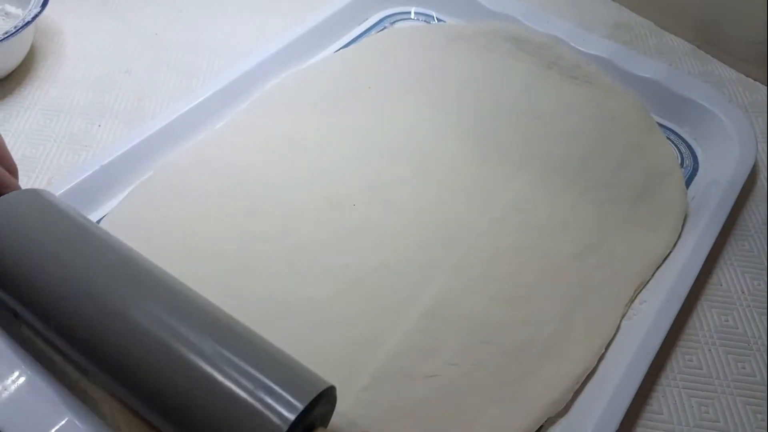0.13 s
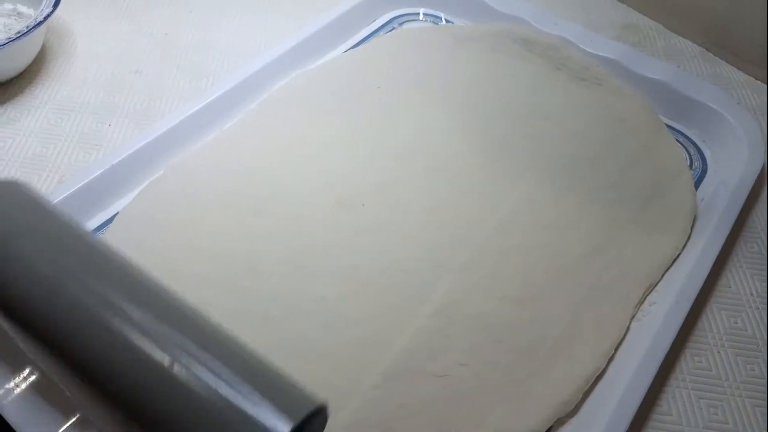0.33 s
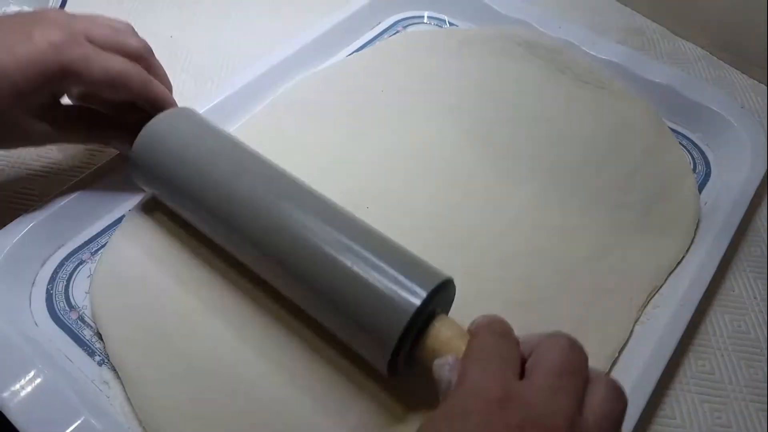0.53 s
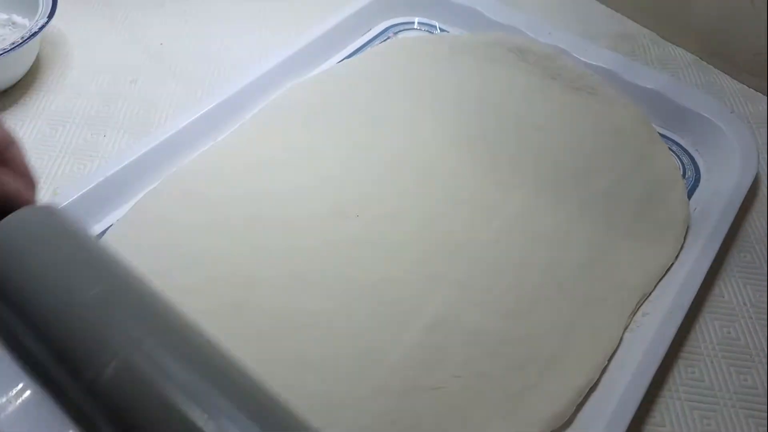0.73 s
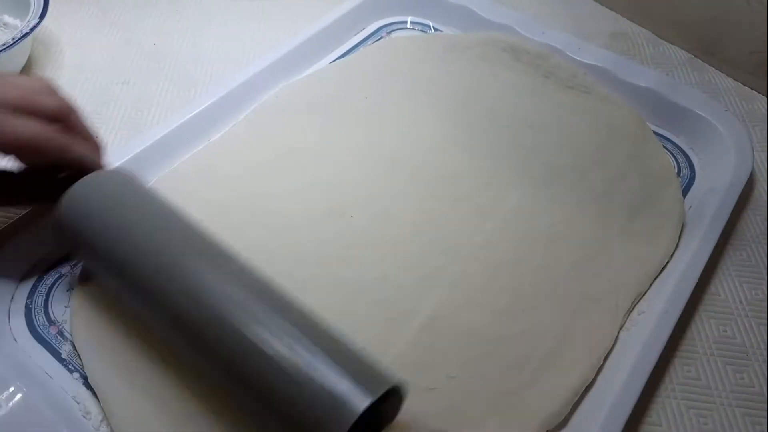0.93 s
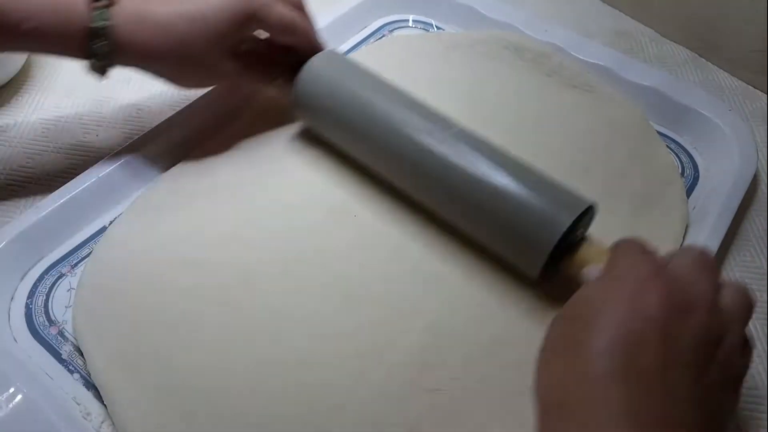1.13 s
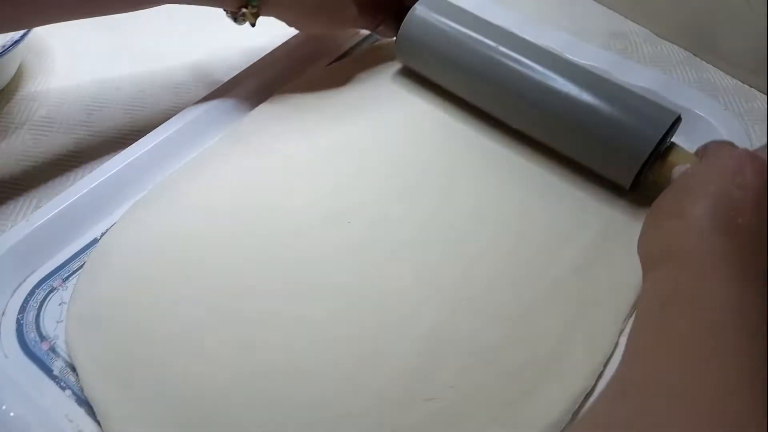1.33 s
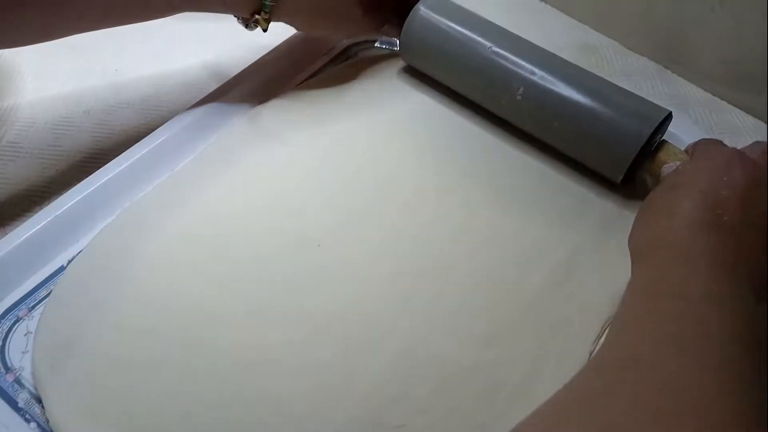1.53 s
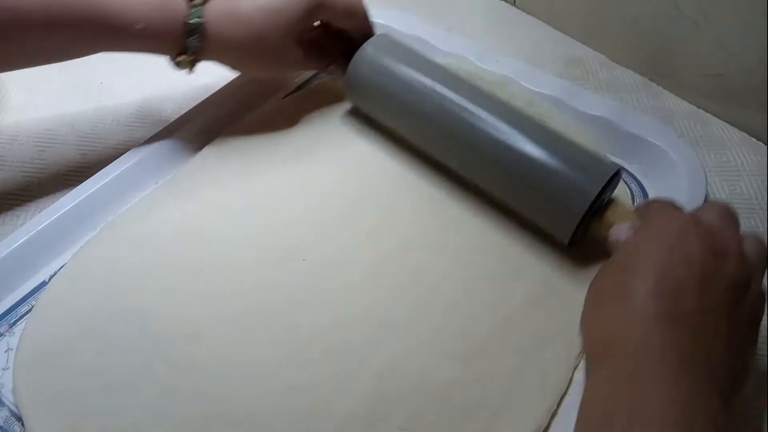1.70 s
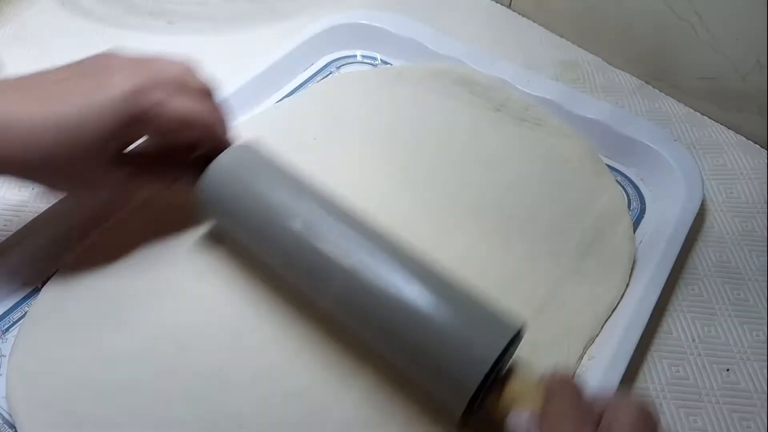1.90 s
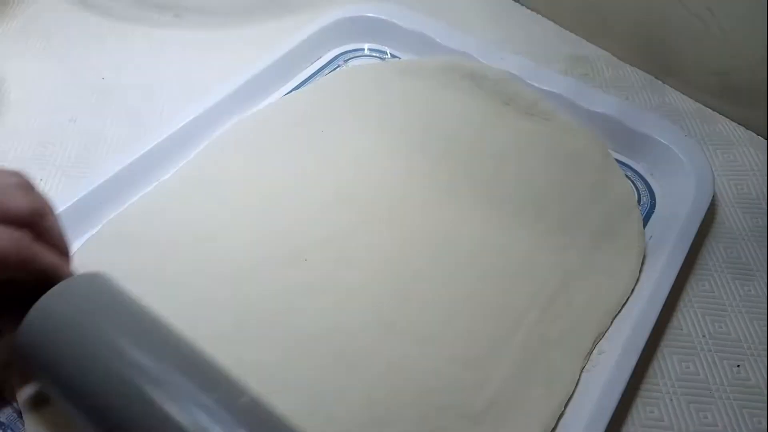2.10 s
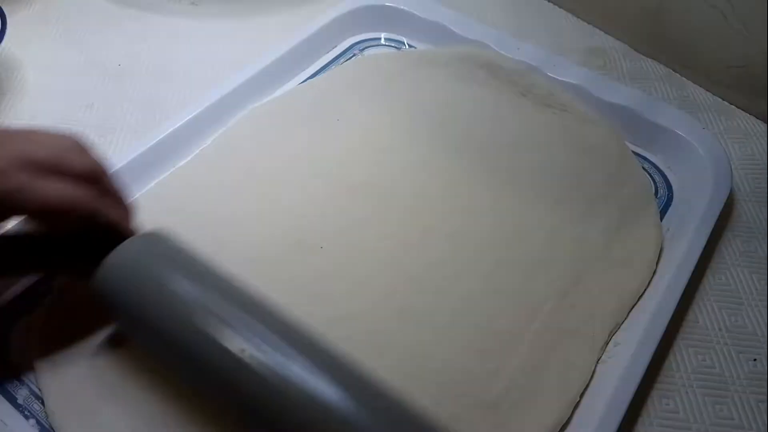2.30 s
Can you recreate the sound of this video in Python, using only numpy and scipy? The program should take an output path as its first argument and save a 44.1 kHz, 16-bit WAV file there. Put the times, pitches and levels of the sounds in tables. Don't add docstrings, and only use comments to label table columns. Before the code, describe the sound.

Hollow rolling pin clacks and thuds onto a dough tray, then hisses softly to and fro

```python
import sys
import numpy as np
from scipy import signal
from scipy.io import wavfile
from scipy.ndimage import uniform_filter1d

SR = 44100
rng = np.random.default_rng(int(sys.argv[2]) if len(sys.argv) > 2 else 0)


def makeup_ratio(level_db):
    decades = np.asarray(level_db, float) / 20
    return 10 ** decades


def file_out(sig):
    cols = np.atleast_2d(sig).T
    lim = np.clip(cols, -1, 1)
    pcm = np.round(lim * 32767).astype(np.int16)
    wavfile.write(sys.argv[1], SR, pcm)


N = 103635

# start_s, level_db, table_boom_db, brightness_db (per octave)
THUDS = [
    (0.2041, -22, -2, -1.5),
    (0.787, -12, -6.5, 0),
    (1.1318, -36, -9, -1.5),
    (1.165, -48, -12.5, -1),
]
# mode_hz, level_db, t60_s
TABLE = [(77, -27.5, 0.13), (84, -14.5, 0.27), (96.1, 1, 0.25), (136.6, -5, 0.2), (159.9, -6.5, 0.17),
         (220, -12.5, 0.14)]


def evened(x):
    return x / np.sqrt(np.mean(x ** 2) + 1e-20)


def read(points, hz):
    f, value = np.transpose(points)
    return np.interp(np.log(hz + 1), np.log(f + 1), value)


def colour(x, points):
    hz = abs(np.fft.fftfreq(8192, 1 / SR))
    log_gain = read(points, hz) * np.log(10) / 20
    response = np.exp(np.conj(signal.hilbert(log_gain)))
    taps = np.fft.ifft(response).real[:4096]
    return signal.oaconvolve(x, taps)[:len(x)]


def add(mix, s, sound):
    part = mix[round(s * SR):][:len(sound)]
    part += sound[:len(part)]


def ring(modes, bright_db=0, pitch=1, bend_s=0, length=1):
    t = np.arange(SR // 2)[:, None] / SR
    hz, db, t60 = np.transpose(modes)
    level_luck, pitch_luck = rng.standard_normal((2, len(hz)))
    db = db + 2.0 * level_luck + bright_db * np.log2(hz / 2000)
    rise_s = 0.0001 + bend_s * np.sqrt(500 / hz)
    rise = 1 - np.exp(-(t / rise_s) ** 2)
    decay = makeup_ratio(db - 60 * t / (t60 * length))
    tones = np.sin(2 * np.pi * hz * pitch * (1 + 0.0088 * pitch_luck) * t)
    y = (decay * rise * tones).sum(1)
    return y / abs(y).max()


def crack(points, t60, bright_db):
    t = np.arange(SR // 2) / SR
    tilted = [(f, db + bright_db * np.log2(f / 2000)) for f, db in points]
    y = colour(rng.standard_normal(len(t)) * makeup_ratio(-60 * t / t60), tilted)
    return y / abs(y).max()


def air():
    # freq_hz, level_db
    room_tone = [(20, -24), (100, 0), (250, -9.5), (560, -12.5), (900, -17), (2000, -22), (7500, -28.5),
                 (16000, -45)]
    return makeup_ratio(-61) * evened(colour(rng.standard_normal(N + SR), room_tone)[SR:])


def table():
    # start_s, level_db, ring_length_factor
    wobbles = [(.0, -42, 0.93), (0.037, -40.5, 0.26), (0.225, -37.5, 0.2), (0.282, -32.5, 0.97),
               (0.331, -46, 1), (0.433, -39.5, 0.93), (0.557, -37, 0.53), (0.599, -33.5, 0.61),
               (0.69, -46, 0.55), (0.81, -24, 0.76), (0.863, -26, 0.7), (0.923, -28.5, 1),
               (0.997, -37.5, 0.54), (1.027, -37.5, 0.47), (1.101, -39.5, 0.95), (1.164, -42.5, 1.0),
               (1.206, -43.5, 0.99), (1.353, -53, 0.74), (1.4, -54, 0.78), (1.489, -47, 1),
               (1.517, -42.5, 0.96), (1.583, -43.5, 0.94), (1.686, -39, 0.74), (1.808, -42.5, 1),
               (1.933, -39, 1), (2.017, -46, 0.48), (2.048, -42.5, 0.17), (2.168, -44.5, 1.0),
               (2.207, -43, 1), (2.248, -46, 1)]
    soft_s = 0.009
    tremble = rng.standard_normal(N + SR)
    hum = signal.oaconvolve(tremble, ring(TABLE, bend_s=0.0013))[SR:SR + N]
    out = makeup_ratio(-53) * evened(hum)
    for s, db, length in wobbles:
        add(out, max(s - soft_s, 0), makeup_ratio(db + 2.5) * ring(TABLE, bend_s=soft_s, length=length))
    return out


def rub():
    # time_s, effort_db, near_handle_load (0-1), far_handle_load (0-1)
    roll = [(0.202, -74, .3, .3), (.78, -53, .4, 0.3), (.95, -44, .4, .1), (1.091, -40, 0.2, 0.2),
            (1.17, -41, .5, .7), (1.24, -44.5, .6, 0.7), (1.34, -48, .3, 0.64), (1.45, -55.5, 0.4, 1),
            (1.479, -57, .3, .8), (1.592, -67, 0.08, 1), (1.606, -55, 0.8, .4), (1.661, -57, .1, 1),
            (1.7, -49.5, 0.6, .9), (1.799, -46, .8, .7), (1.885, -40.5, 0.6, 0), (2.071, -45, .7, 0),
            (2.13, -53.5, 0.8, 0), (2.214, -52, 1, 0), (2.251, -76, 0.97, 0.3), (2.286, -57.5, 1, 0.2),
            (2.319, -43, 0.9, 0)]
    # freq_hz, level_db
    friction = [(200, -26.5), (550, -10.5), (1000, -17), (1600, -7.5), (2500, -5.5), (4500, -3.5),
                (6500, -1), (16000, -6)]
    # centre_hz, width_hz, gain_db
    tube = [(4250, 300, 2.5), (5300, 240, 2), (6300, 900, 3.5), (7700, 250, -3.5)]
    # centre_hz, width_hz, gain_db
    near_handle = (2050, 220, 16)
    # centre_hz, width_hz, gain_db
    far_handle = (3180, 80, 20)

    grains_per_s, grain_share = 3000, 0.36
    grain_size = makeup_ratio(2.5 * np.minimum(rng.exponential(1, N), 5))
    grit = grain_size * (rng.random(N) < grains_per_s / SR) * rng.standard_normal(N)
    drive = grain_share * evened(grit) + (1 - grain_share) * rng.standard_normal(N)
    hz, t, z = signal.stft(drive, SR, nperseg=512, noverlap=384)

    def drift(noise, bins, frames):
        smooth = uniform_filter1d(noise, size=bins, axis=0)
        return evened(uniform_filter1d(smooth, size=frames, axis=1))

    def bump(centre_hz, width_hz, gain_db):
        return (gain_db / (1 + (2 * (hz - centre_hz) / width_hz) ** 2))[:, None]

    noise = rng.standard_normal(z.T.shape).T
    blobs = drift(noise[::-1], 9, 18)
    patches = drift(noise, 2, 36)
    s, effort_db, near, far = np.transpose(roll)
    near = np.clip(np.interp(t, s, near), 0, 1)
    far = np.clip(np.interp(t, s, far), 0, 1)
    peaks_db = sum(bump(*row) for row in tube)
    peaks_db = peaks_db + near * bump(*near_handle) + far * bump(*far_handle)
    z = z * makeup_ratio(read(friction, hz)[:, None] + peaks_db + 3.0 * patches + 2.5 * blobs)
    hiss = evened(signal.istft(z, SR, nperseg=512, noverlap=384)[1][:N])
    return hiss * makeup_ratio(np.interp(np.arange(N) / SR, s, effort_db))


def gives():
    # start_s, level_db, pitch_hz, t60_s
    fuzzy_notes = [(0.2036, -30, 4600, .02), (.31, -34.5, 571, .15), (.44, -48, 185, .2),
                   (0.449, -36, 3400, .02), (.465, -46.5, 354, .35), (.478, -26, 2200, .03),
                   (.555, -42.5, 697, 0.14), (.5545, -31, 4900, .016), (0.582, -23.5, 4220, .03),
                   (.583, -24.5, 6120, .02), (.585, -37.5, 533.7, .3), (.788, -26, 4320, .025),
                   (0.789, -29, 1310, .08), (.792, -29, 946, .1), (0.794, -30.5, 449, .12),
                   (.8, -37, 220, .2), (1.133, -35, 568, 0.032), (1.133, -45.5, 297, 0.17),
                   (1.133, -41.5, 1940, .03), (1.21, -58, 594, 0.87), (1.4, -65.5, 600, 0.38),
                   (1.57, -63, 802, 0.27), (1.94, -54.5, 490, 0.2), (1.945, -54.5, 308, 0.17),
                   (1.95, -58, 623, .12), (1.133, -46.5, 806, .06), (1.134, -50.5, 426, 0.06),
                   (.588, -27, 1775, 0.029), (.583, -24, 3100, .02), (0.48, -37, 948, .04),
                   (1.969, -59, 1054, 0.12), (.86, -38.5, 375, 0.14)]
    out = np.zeros(N)
    for s, db, hz, t60 in fuzzy_notes:
        offsets = rng.uniform(-2, 2, size=5)
        cluster = [(hz * (1 + 0.05 * u), -4 * abs(u), t60) for u in offsets]
        add(out, s, makeup_ratio(db + 6) * ring(cluster, bend_s=0.004))
    return out


def thuds():
    # mode_hz, level_db, t60_s
    tray_modes = [(267, -8, 0.067), (350, -3, 0.055), (539.5, -2.5, 0.049), (683, 2.5, 0.026),
                  (845, -5.5, 0.038), (1080, -10, 0.036), (1350, -7, 0.029), (2053, -9, 0.029),
                  (2524, -6, 0.044), (2820, -11.5, 0.013), (4274, -8, 0.0098)]
    # freq_hz, level_db
    tray_crack = [(150, -45), (400, -7), (800, -1), (1300, 4), (2550, -2.5), (4500, 2.5), (7000, -13),
                  (16000, -11)]
    out = np.zeros(N)
    for s, db, boom_db, bright_db in THUDS:
        tray = ring(tray_modes, bright_db, bend_s=0.005)
        tray = tray + makeup_ratio(5.5) * crack(tray_crack, 0.03, bright_db)
        boom = ring(TABLE, bend_s=0.0072, length=0.29)
        add(out, s, makeup_ratio(db + 4.5) * (tray + makeup_ratio(1 + boom_db) * boom))
    return out


def shudder():
    # freq_hz, level_db
    blur = [(120, -20), (250, 0.5), (500, -0.5), (950, -1), (1500, -5), (3000, -14), (6000, -25)]
    out = np.zeros(N)
    rise = np.minimum(np.arange(SR // 2) / SR / 0.009, 1)
    for s, db, boom_db, bright_db in THUDS:
        add(out, s, makeup_ratio(db - 16) * rise * crack(blur, 0.41, 0))
    return out


def clacks():
    # start_s, level_db, brightness_db (per octave), pitch_factor, ring_db (against crack)
    knocks = [(0.3047, -14.5, 0, 1.05, 7), (0.3089, -17, -3.5, 0.98, 10), (0.3141, -16.5, 5.5, 1.05, -2.5),
              (0.3175, -18, 2.5, 0.9, 8), (0.3212, -20, 1.5, 0.88, 8), (0.329, -31.5, 0.5, 1.1, 6.5),
              (0.4502, -25, 3, 1.0, -3.5), (0.4525, -25, 4, 0.82, -8), (0.4575, -29, -3.5, 0.9, 8),
              (0.4764, -24, -1.5, 1.04, 12), (0.4797, -26, 6, 1.04, 1.5), (0.484, -25, -3, 0.89, 7.5),
              (0.554, -12.5, -4.5, 1.1, 3), (0.5559, -19.5, 1, 0.93, 5.5), (0.558, -18.5, -3, 1.3, -1.5),
              (0.5831, -6.5, 1, 1.02, -12), (0.5844, -15, 3, 0.93, -2), (0.588, -15, -1, 0.97, -0.5),
              (0.5965, -25, -1, 1.1, -2), (0.852, -42, 4, 0.62, 3), (0.858, -35.5, -2.5, 1.15, 5),
              (1.847, -46, -2, .61, 9)]
    # mode_hz, level_db, t60_s
    pin_modes = [(1300, -9.5, .015), (1420, -5.5, 0.033), (1690, -11.5, 0.0068), (1759, -12, .02),
                 (2017, -0.5, 0.032), (2230, -1, 0.039), (2660, -8.5, .02), (3590, -3, 0.0076),
                 (4280, -14.5, 0.011), (4900, -9, 0.016), (5290, -17.5, .015), (6290, -11, 0.054),
                 (7120, -17.5, .015)]
    # freq_hz, level_db
    pin_crack = [(300, -62.5), (800, -15), (1300, 5), (2400, 1.5), (4200, 1), (5200, -4.5), (6300, -7),
                 (16000, -17.5)]
    out = np.zeros(N)
    for s, db, bright_db, pitch, ring_db in knocks:
        knock = makeup_ratio(ring_db) * ring(pin_modes, bright_db, pitch, 0.00039)
        knock = knock + makeup_ratio(4) * crack(pin_crack, 0.025, bright_db)
        add(out, s, makeup_ratio(db + 7.5) * knock / abs(knock).max())
    return out


def kitchen(x):
    # freq_hz, t60_s
    reverb = [(200, 0.61), (800, 0.49), (1400, 0.47), (3000, 0.38), (8000, 0.37)]
    # delay_s, level_db
    echoes = [(.0031, -21.5), (.0054, -19.5), (.0092, -21.5), (0.0143, -26), (0.0212, -21.5)]
    out = np.zeros(N)
    turn = np.arange(N) / SR * 23
    for k in range(3):
        taps = np.zeros(SR)
        at = np.arange(200, SR - 20, 20)
        taps[at + rng.integers(0, 20, len(at))] = rng.choice([-1., 1.], len(at))
        hz, t, z = signal.stft(taps, SR, nperseg=256)
        decay = makeup_ratio(-60 * t / read(reverb, hz)[:, None])
        tail = signal.istft(z * decay, SR, nperseg=256)[1]
        share = np.sqrt(2 / 3) * np.cos(np.pi * (turn + k / 3))
        out += signal.fftconvolve(x * share, makeup_ratio(-9.5) * tail / np.linalg.norm(tail))[:N]
    for s, db in echoes:
        add(out, s, makeup_ratio(db) * x)
    return out


def scene():
    rolling = rub()
    hits = thuds() + clacks()
    reflected = kitchen(hits + makeup_ratio(-14) * rolling)
    mix = hits + rolling + reflected + table() + gives() + shudder() + air()
    return mix[None]


def top_cut(x):
    return signal.sosfilt(signal.butter(12, 15750, fs=SR, output="sos"), x)


def record(dry):
    # freq_hz, gain_db
    mic = [(20, -21.5), (70, -5.5), (7300, -6.5), (7800, -17), (8500, -40.5), (10500, -36.5),
           (12000, -45.5), (15500, -41.5)]
    x = colour(dry[0], mic) + makeup_ratio(-85.5) * rng.standard_normal(N)
    return top_cut(x[None])


dry = scene()
out = record(dry)
file_out(out)
```